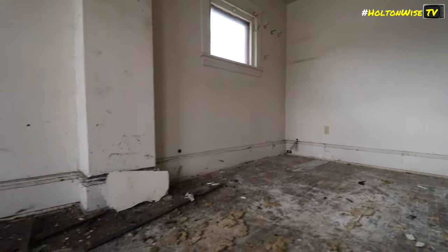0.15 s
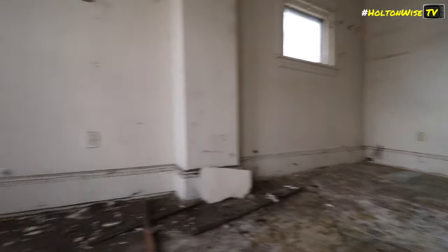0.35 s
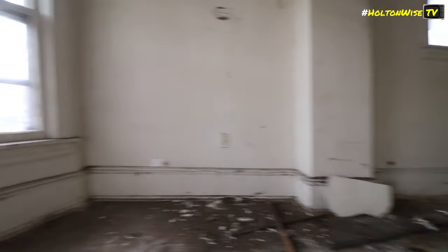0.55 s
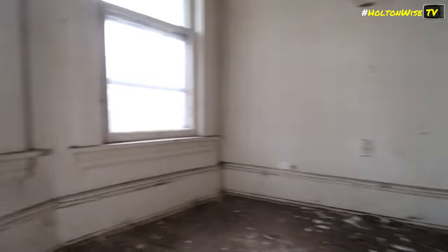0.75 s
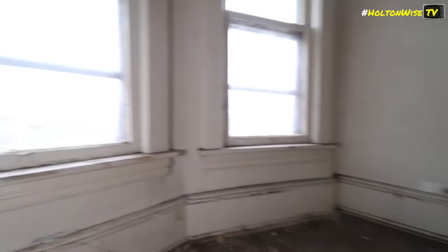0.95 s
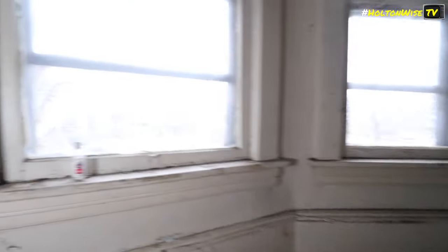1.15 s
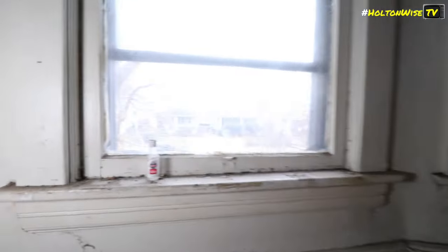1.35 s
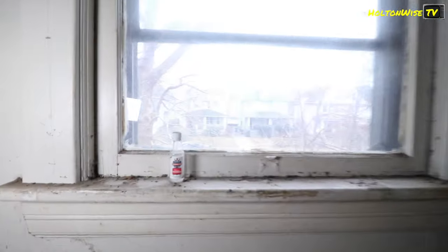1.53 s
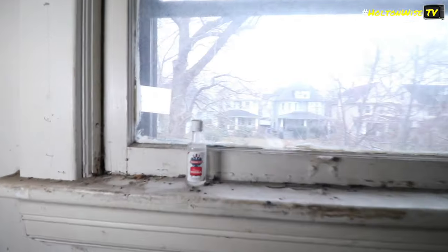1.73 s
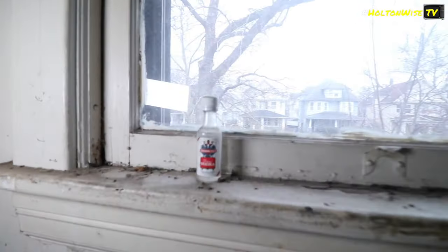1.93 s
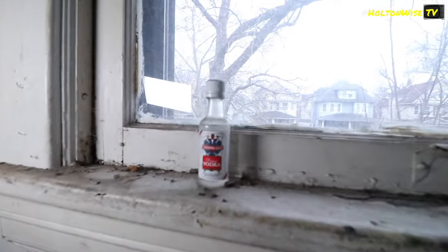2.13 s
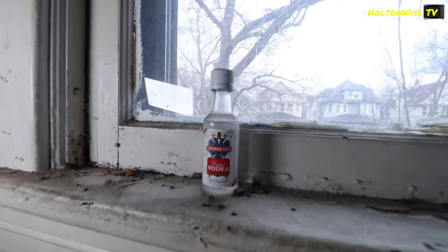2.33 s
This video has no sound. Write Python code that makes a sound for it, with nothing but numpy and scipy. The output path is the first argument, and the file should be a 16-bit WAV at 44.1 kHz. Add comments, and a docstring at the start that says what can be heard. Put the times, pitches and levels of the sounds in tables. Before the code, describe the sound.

Slow shoe steps thud on a dirty wooden floor, soles scraping grit and flakes snapping underfoot; hard bare walls reverberate, with a faint low outdoor hush behind, captured in stereo by the walker's phone.

```python
"""A faint outdoor hush and a sole scraping over grit open the scene: heavy shoes cross an empty room.
Heels and soles knock the bare boards, heard as bursts of damped modes; flakes snap now and then.
Hush, scrapes and snaps are filtered noise, the scrapes made of dense random grains.
The bare walls ring through convolution with decaying noise bands; the walker's phone colours it all."""
import sys
import numpy as np
from scipy import signal
from scipy.fft import rfft, irfft, next_fast_len
from scipy.io import wavfile

SR = 44100
rng = np.random.default_rng(int(sys.argv[2]) if len(sys.argv) > 2 else 0)


def waveform_to_disk(signal):
    """Save audio, clipped to [-1, 1], as 16-bit WAV at the path in sys.argv[1]."""
    frames = np.transpose(np.atleast_2d(signal))
    scaled = np.clip(frames, -1, 1) * 32767
    samples = np.round(scaled).astype(np.int16)
    wavfile.write(sys.argv[1], SR, samples)


N = 109632

# Outdoor hush as the phone hears it. Each row: frequency in Hz, relative density in dB per Hz.
HUSH_SPECTRUM = [(20, -12.5), (60, -4), (200, -10), (350, -9), (700, -16), (1400, -18), (2400, -25.5),
                 (4500, -30), (9000, -29.5), (15500, -37)]
# Soles sliding on grit. Each row: start in seconds, rise in seconds, hold in seconds, fade time constant
# in seconds, scrape level in dB, scrape centre in Hz, hiss level in dB, hiss centre in Hz, left over right in dB.
SOLE_SCUFFS = [(-.05, 0.01, 0.066, 0.046, -45.5, 833, -57.5, 5200, -1),
               (0.01, 0.033, 0.057, 0.0095, -48, 1200, -41.5, 6500, -2.5),
               (0.082, 0.019, 0.056, 0.13, -38.5, 1400, -47, 7900, -4),
               (0.21, 0.021, 0.01, 0.028, -41.5, 1490, -68, 6500, -2.2),
               (0.244, 0.0077, 0.0082, 0.061, -37, 1850, -90, 6500, -5.5),
               (0.486, 0.074, 0.48, 0.01, -54.5, 970, -55.5, 8330, -4.5),
               (0.802, 0.016, 0.021, 0.02, -37, 1390, -38, 8000, 0.5),
               (0.847, 0.015, 0.024, 0.15, -44, 1110, -52, 7000, -5.5),
               (0.991, 0.024, 0.042, 0.013, -44.5, 1320, -39, 11200, -2.5),
               (1.116, 0.027, 0.3, 0.046, -60, 1510, -61, 8400, -8),
               (1.404, 0.084, 0.065, 0.015, -54, 1470, -53.5, 8800, -1.1),
               (1.563, 0.0091, 0.0067, 0.058, -36, 1760, -43.5, 9100, -5.5),
               (1.68, 0.016, 0.011, 0.12, -44, 1320, -47.5, 7900, 0),
               (1.762, 0.034, 0.12, 0.09, -47.5, 617, -72, 7700, -4.5),
               (1.873, 0.041, 0.04, 0.022, -46, 3000, -42.5, 7700, 2.5),
               (1.9, 0.047, 0.02, 0.056, -31.5, 1340, -46.5, 9700, 0.2),
               (2.023, 0.0083, 0.013, 0.06, -48, 1410, -65, 8060, -18)]
# Reverberation of the bare room. Each row: frequency in Hz, t60 in seconds, relative level in dB,
# side-to-middle amplitude ratio.
ROOM_BANDS = [(30, 0.32, -29, 0.46), (101, 0.23, -6.5, 0.29), (234, 0.77, 2, 0.22), (620, 0.6, 10, 0.38),
              (1390, 1, 7, .9), (3320, 0.63, 3, 1.05), (7400, 0.52, 4, 1.05), (13800, 0.18, -0.5, 0.92)]
# Shoes striking the boards. Each row: start in seconds, level in dB, centre of the push in Hz,
# spread of the push in octaves, ring length as a multiple of each mode's t60.
SHOE_KNOCKS = [(.056, -38, 320, 0.4, 0.64), (.092, -36.5, 335, 1.1, 0.61), (.095, -40, 33, 0.45, 0.65),
               (0.136, -40.5, 130, 0.82, 1.9), (0.204, -39, 31.8, 0.5, 1.4), (.17, -43, 282, 0.25, 1.7),
               (.235, -42, 277, 0.54, 2.1), (.253, -36, 1400, 0.74, 1.2), (0.299, -40.5, 275, 0.3, 1.1),
               (.318, -37, 118, .6, 0.64), (0.534, -42.5, 50, 0.54, 0.9), (.645, -45.5, 360, 1.34, 0.5),
               (0.7904, -19, 171, 0.37, .9), (.792, -32, 484, 0.37, 0.46), (0.798, -32, 36, .6, 1.7),
               (.813, -26, 204, 0.54, 0.35), (.842, -26, 177, 0.88, 1.05), (1.014, -34, 271, 0.68, 0.78),
               (1.071, -48.5, 33.4, 0.47, 0.68), (1.175, -40, 216, 1.1, 0.76),
               (1.535, -25.5, 330, 0.48, 1.1), (1.5385, -25.5, 1060, 0.47, 0.86),
               (1.5423, -21.5, 186, 0.38, 1.04), (1.561, -24, 74, 0.77, 1.4),
               (1.573, -25, 1390, 0.41, 0.46), (1.584, -23.5, 490, 0.95, 0.55),
               (1.626, -29, 292, 0.99, 0.6), (1.805, -30, 270, 0.31, 0.73), (1.838, -29.5, 94.5, 0.17, 1.6),
               (1.904, -32.5, 97, .3, 3), (1.935, -28, 776, 0.17, 0.62), (1.946, -25.5, 650, 0.24, 0.57),
               (1.9555, -23.5, 600, 0.49, 0.58), (1.958, -20, 102, 0.42, 1.4),
               (1.983, -28.5, 1560, 0.17, 1.6), (1.97, -32, 273, 0.19, 2.46), (2.029, -42.5, 275, 0.2, 4.2),
               (2.024, -25.5, 99, 0.35, 1.1), (2.098, -30, 97.5, 0.25, 1.2)]
# Modes of boards and joists. Each row: nominal frequency in Hz, relative level in dB, nominal t60 in seconds.
BOARD_MODES = [(29.7, -2, 0.48), (68, -18, 0.77), (95.13, -9.5, 0.31), (114.4, 1.5, 0.11),
               (164.2, 2.5, 0.076), (198, -12, 0.35), (247.7, 1.5, 0.086), (286.7, -2, 0.14),
               (347.4, -0.5, 0.12), (444.4, 2, 0.066), (537, 3, 0.04), (676.4, 1.5, 0.097),
               (875, -2.5, 0.057), (968, -14.5, 0.21), (1260, -0.5, 0.048), (1434, 2.5, 0.044),
               (2050, -27, 0.09)]
# Flakes snapping. Each row: start in seconds, level in dB, centre in Hz.
FLAKE_SNAPS = [(0.8202, -31, 5100), (0.8257, -30.5, 5160), (1.573, -45, 8100), (1.582, -25, 10600),
               (1.592, -40, 10000), (1.602, -29, 10600), (2.067, -40, 7100)]
# Response of the phone's microphone. Each row: frequency in Hz, gain in dB.
MIC_RESPONSE = [(20, 5.5), (2500, 2), (3700, 1), (4900, -6), (6200, -1), (9500, -0.5), (15500, -7.5)]

HUSH_DB = -49.5  # rms level ahead of the microphone
SCRAPE_OCT, HISS_OCT = 1.177, 0.88  # band spreads in octaves
GRAINS_PER_S, GRAIN_DB = 5000, 2.0  # mean grain rate; scale of the random grain size in dB
SPREAD, DUST = 1.64, 0.3  # left-right scatter of the grains; amplitude of fine dust under them
FIRST_ECHO_S, BUILD_S = 0.002, 0.023  # seconds to the first echo, then to full reverberation
KNOCK_ECHO_DB = -0.5  # knock level sent to the room
DETUNE = 0.021  # standard deviation of each mode's frequency, as a fraction
THUMP_DB, THUMP_CYCLES = 7, 0.96  # thump level per squared octave of spread; decay constant in cycles
ATTACK_CYCLES, LOW_CUT = 0.71, 0.3  # onset in cycles of the push; low cut as a share of its centre
SNAP_S, SNAP_OCT = 0.0016, 0.45  # decay constant in seconds; band spread in octaves
TOP_HZ = 15300  # upper limit of the phone

T = np.arange(N) / SR
SIZE = next_fast_len(N + SR)
HZ = np.maximum(np.arange(SIZE // 2 + 1) * SR / SIZE, 1)
LN_1000 = np.log(1000)  # a fall of 60 dB, as t60 is defined


def undb(db):
    """Level law: amplitude is ten to the power of decibels over twenty."""
    return 10 ** (np.asarray(db) / 20)


def unit(x):
    """Normalisation: scale to a root mean square of 1."""
    return x / np.sqrt(np.mean(x ** 2))


def shape(x, gain):
    """Linear filtering: multiply the spectrum of x by a gain."""
    return irfft(rfft(x, SIZE) * gain, SIZE)[..., :N]


def bell(hz, octaves):
    """Band selection: a Gaussian gain over log frequency, centred on hz."""
    return np.exp(-0.5 * (np.log2(HZ / hz) / octaves) ** 2)


def column(table, hz, order=1):
    """Interpolation: read one column of a table over log frequency."""
    table = np.array(table)
    return np.interp(np.log(hz), np.log(table[:, 0]), table[:, order])


def sides(pan_db):
    """Level panning: left and right gains that differ by pan_db."""
    return undb(np.array([[pan_db / 2], [-pan_db / 2]]))


def hush():
    """Filtered noise: steady outdoor rumble and hiss through the windows, more alike left and right in the bass."""
    share = column(ROOM_BANDS, HZ, order=3)
    # The microphone's gain is taken out here because it is applied later
    density_db = column(HUSH_SPECTRUM, HZ) - column(MIC_RESPONSE, HZ)
    gain = undb(density_db) / np.hypot(1, share)
    mid, side = shape(rng.standard_normal((2, N)), np.array([gain, gain * share]))
    return undb(HUSH_DB) * unit(np.array([mid + side, mid - side]))


def scuffs():
    """Granular friction: many uneven impacts excite a dull scrape and a bright hiss under one push."""
    out = np.zeros((2, N))
    for s, rise, hold, fade, scrape_db, scrape_hz, hiss_db, hiss_hz, pan_db in SOLE_SCUFFS:
        size = undb(GRAIN_DB * np.minimum(rng.exponential(size=N), 4))
        struck = rng.random(N) < GRAINS_PER_S / SR
        grains = struck * rng.uniform(-1, 1, N) * size
        # Each grain gets its own balance between left and right
        scatter = 1 + SPREAD * rng.uniform(-1.13, 1, N) * np.array([[1], [-1]])
        dust = DUST * rng.uniform(-0.7, 1, (2, N))
        grit = unit(grains * scatter + dust)
        onset = np.clip((T - s) / rise, 0, 1) ** 2
        push = onset * np.exp(-np.maximum(T - s - rise - hold, 0) / fade)
        scrape = undb(scrape_db) * unit(bell(scrape_hz, SCRAPE_OCT))
        hiss = undb(hiss_db) * unit(bell(hiss_hz, HISS_OCT))
        out += sides(pan_db) * push * shape(grit, scrape + hiss)
    return out


def room(x):
    """Reverberation: convolve with half-octave noise bands, each decaying exponentially at its own t60."""
    tail, t = np.zeros((2, N)), T[:SR + SR // 2]
    noise = rfft(rng.standard_normal((2, N)), SIZE)
    for hz in 25 * 2 ** np.arange(0, 9.6, 0.5):
        mid, side = irfft(noise * bell(hz, 0.25), SIZE)[:, :len(t)]
        t60, db, share = (column(ROOM_BANDS, hz, order=k) for k in (1, 2, 3))
        # The square root keeps a band's energy independent of its decay time
        fall = np.sqrt(2 * LN_1000 / t60 / SR) * np.exp(-LN_1000 * t / t60)
        band = np.array([mid + share * side, mid - share * side]) / np.hypot(1, share)
        tail[:, :len(t)] += undb(db - 4) * fall * band
    build = np.clip((T - FIRST_ECHO_S) / BUILD_S, 0, 1)
    return shape(tail * build, rfft(x, SIZE))


def knocks():
    """Modal excitation: a push rings the board modes near its pitch; broad pushes add a stronger thump."""
    out = np.zeros(N)
    detunings = 1 + DETUNE * rng.standard_normal((len(SHOE_KNOCKS), len(BOARD_MODES)))
    for (s, db, hz, octaves, length), detuning in zip(SHOE_KNOCKS, detunings):
        start = int(s * SR)
        t = T[:min(N - start, SR)]
        thump = np.sin(2 * np.pi * hz * t) * np.exp(-t * hz / THUMP_CYCLES)
        ring = undb(THUMP_DB) * octaves ** 2 * thump
        for (mode_hz, mode_db, t60), factor in zip(BOARD_MODES, detuning):
            u = t[:int(t60 * length * SR)]
            near = np.exp(-0.5 * (np.log2(mode_hz / hz) / octaves) ** 2)
            decay = np.exp(-LN_1000 * u / t60 / length)
            ring[:len(u)] += undb(mode_db) * near * np.sin(2 * np.pi * mode_hz * factor * u) * decay
        attack = np.sin(np.pi / 2 * np.minimum(t * hz / ATTACK_CYCLES, 1)) ** 2
        cut = signal.butter(2, LOW_CUT * hz, "high", fs=SR)
        out[start:start + len(t)] += undb(db) * signal.lfilter(*cut, ring * attack)
    return out


def snaps():
    """Impulsive fracture: very short bright noise bursts, each of a set energy."""
    out = np.zeros(N)
    for s, db, hz in FLAKE_SNAPS:
        fall = (T >= s) * np.exp(-np.maximum(T - s, 0) / SNAP_S)
        crack = fall * shape(rng.standard_normal(N), bell(hz, SNAP_OCT))
        energy_match = np.sqrt(np.sum(fall ** 2) / np.sum(crack ** 2))
        out += undb(db) * crack * energy_match
    return out


def scene():
    """Superposition: hush, grit and knocks add to the room's reply."""
    quiet = hush()
    grit = scuffs() + snaps()
    boards = knocks()
    # The room is driven by the knocks and the left channel of the grit
    echo = room(undb(KNOCK_ECHO_DB) * boards + grit[0])
    return boards + grit + echo + quiet


def record(dry):
    """Transducer response: the phone dips near 5 kHz and a steep low-pass cuts the top."""
    coloured = shape(dry, undb(column(MIC_RESPONSE, HZ)))
    low_pass = signal.ellip(10, 0.2, 80, TOP_HZ, fs=SR, output="sos")
    return signal.sosfilt(low_pass, coloured)


dry = scene()
out = record(dry)
waveform_to_disk(out)
```